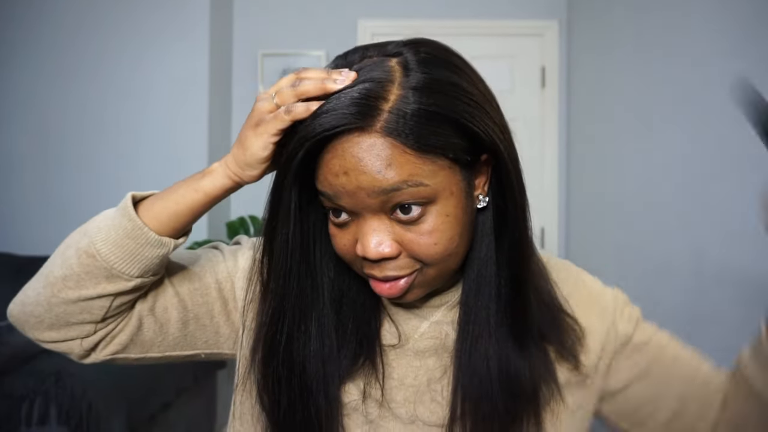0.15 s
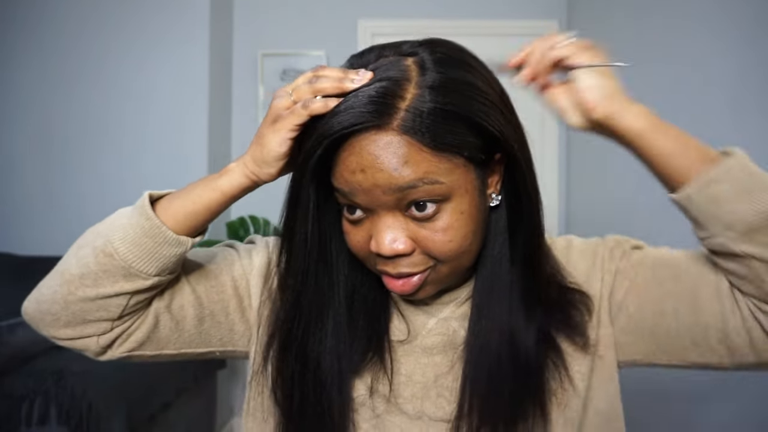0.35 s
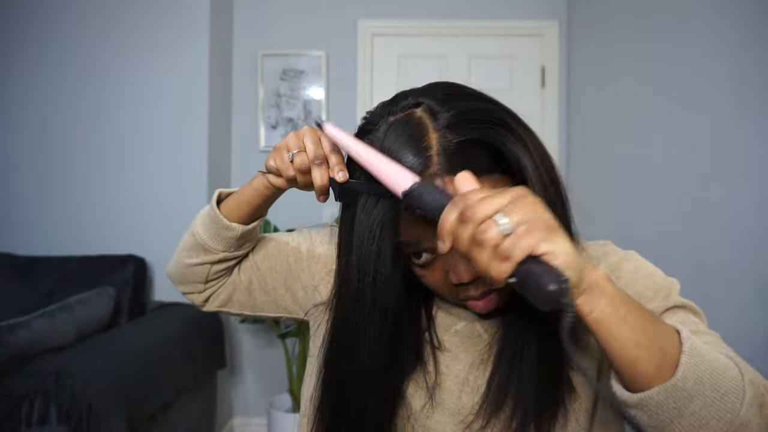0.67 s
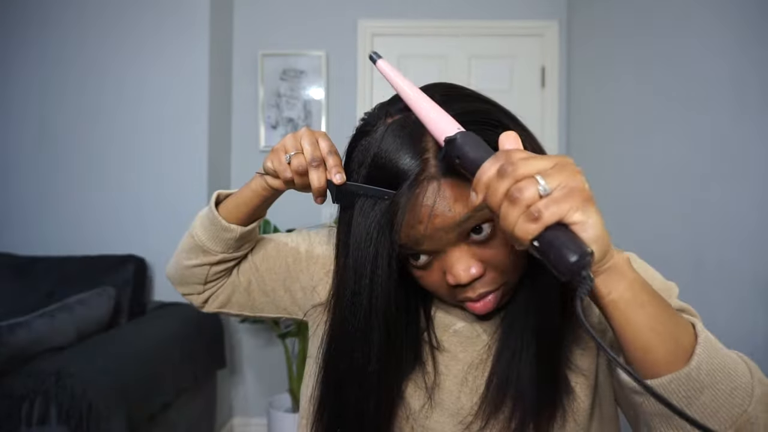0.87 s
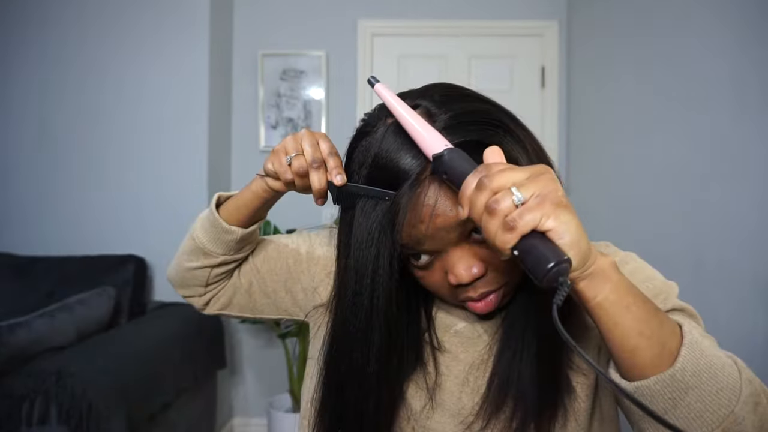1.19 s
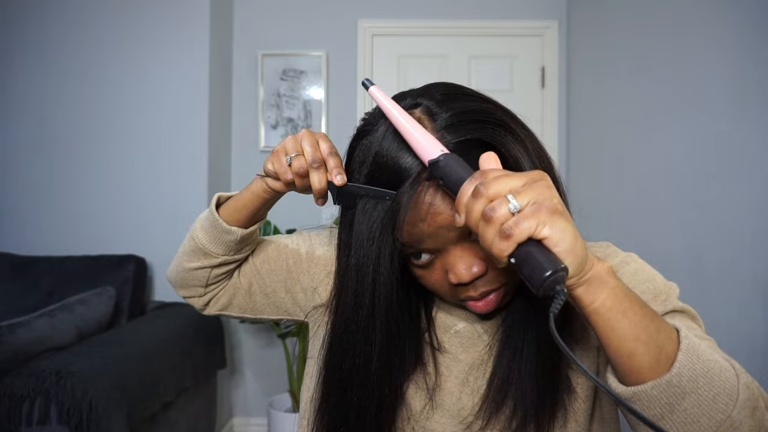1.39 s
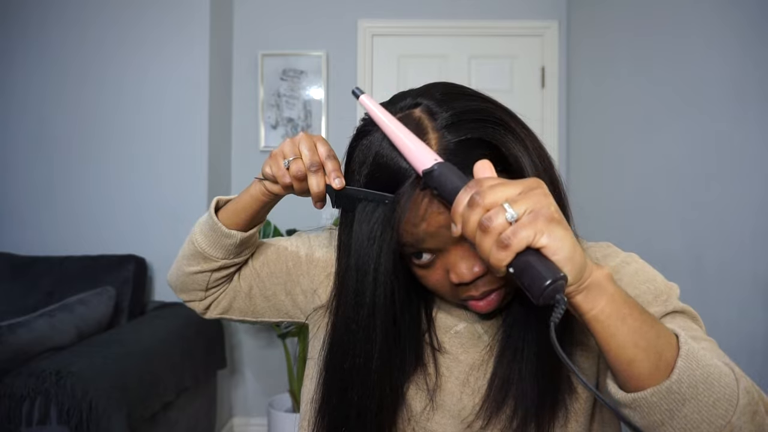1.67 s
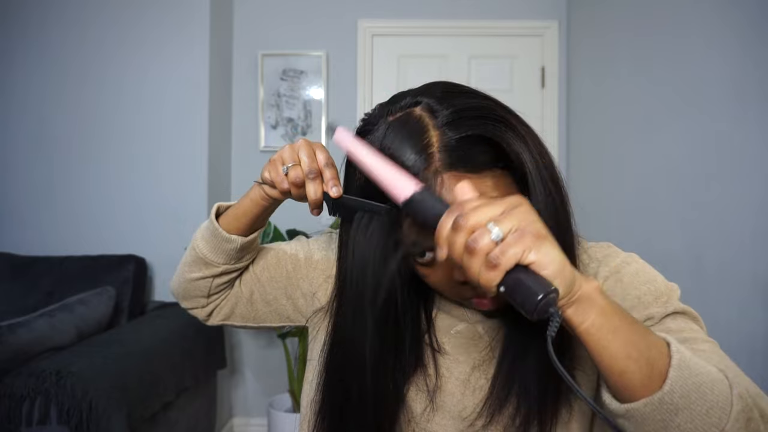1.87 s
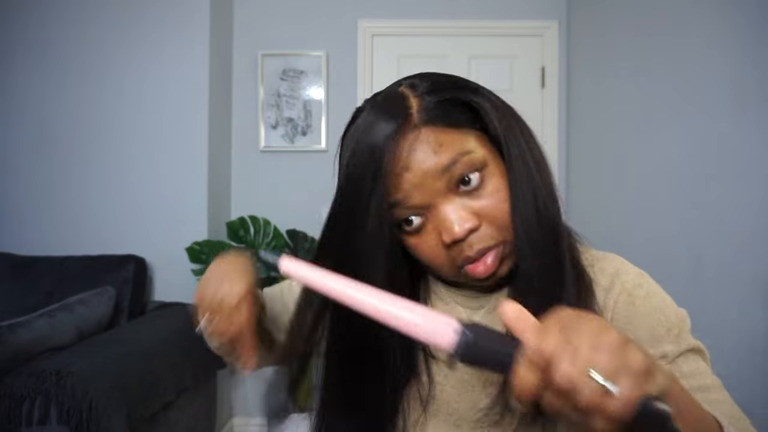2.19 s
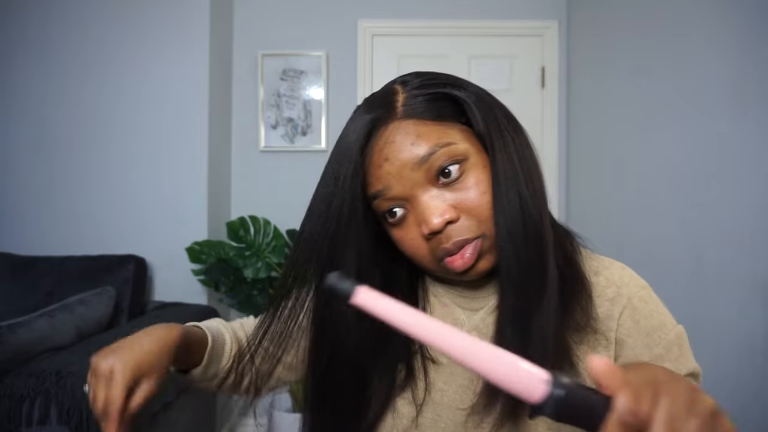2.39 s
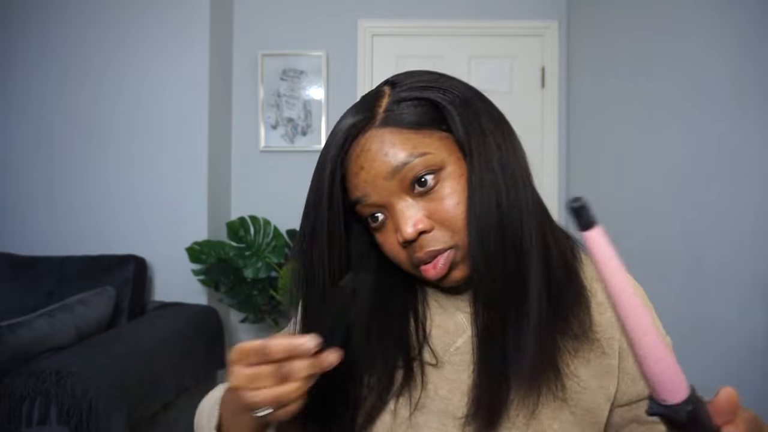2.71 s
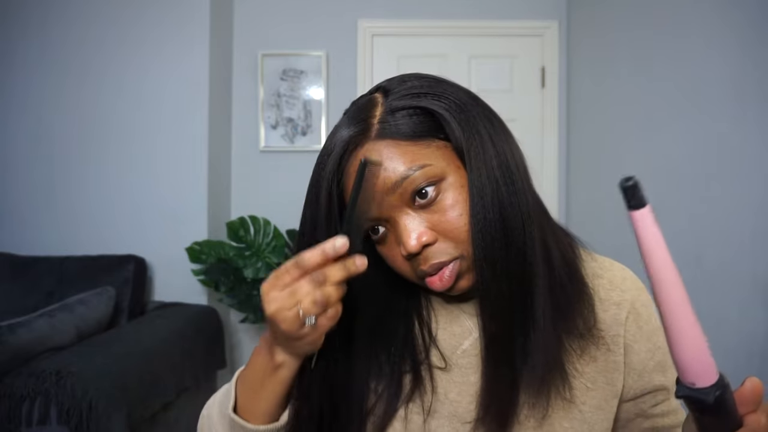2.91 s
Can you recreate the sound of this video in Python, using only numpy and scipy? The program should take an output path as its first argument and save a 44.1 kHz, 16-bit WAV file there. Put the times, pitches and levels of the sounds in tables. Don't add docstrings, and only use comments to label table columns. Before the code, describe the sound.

Plastic hair tools click and knock on a wooden table, slightly right, in a small furnished room with soft hiss. Faint rustling and tiny ticks until 0.6 s, a close fingernail tick at 0.66, a small knocking cluster at 0.9, and a crisp double click at 1.3. From 2.1 s sliding and clatter build to the loudest thud and bright barrel ring near 2.25; more knocks at 2.45, light clicks at 2.75 and 2.9.

```python
import sys
import numpy as np
from scipy import signal
from scipy.fft import rfft, irfft
from scipy.io import wavfile
from scipy.ndimage import uniform_filter1d

SR = 44100
rng = np.random.default_rng(int(sys.argv[2]) if len(sys.argv) > 2 else 0)


def field_ratio(decibels):
    return 10 ** (np.asarray(decibels, dtype=float) / 20)


def to_wav(sig):
    pcm = np.clip(np.atleast_2d(sig), -1, 1) * 32767
    pcm = np.round(pcm).astype(np.int16)
    wavfile.write(sys.argv[1], SR, pcm.T)


N = 134505
HIT_N = 6144


def unit(x):
    return x / np.sqrt(np.mean(x ** 2))


def band(x, hz, width):
    b, a = signal.iirpeak(min(hz, .45 * SR), hz / width, SR)
    return signal.lfilter(b, a, x)


def narrow_band(x, hz, width):
    return band(band(x, hz, width), hz, width)


def high_pass(x, order, hz):
    return signal.lfilter(*signal.butter(order, hz, "high", fs=SR), x)


def decay(t, t60):
    return np.exp(-np.log(1000) * t / t60)


def ring(hz, t60, t):
    return np.sin(2 * np.pi * hz * t) * decay(t, t60)


def lean(db):
    return field_ratio(np.array([[.5], [-.5]]) * db)


def colour(points):
    f = np.fft.rfftfreq(N, 1 / SR) + 1
    hz, db = np.array(points).T
    spectrum = rfft(rng.standard_normal(N)) * field_ratio(np.interp(np.log(f), np.log(hz), db))
    return unit(irfft(spectrum, N))


def hiss():
    # pitch in Hz, level in dB per Hz.
    mid_curve = [(20, -15), (50, -7), (110, -5), (300, -3.5), (700, -8), (1600, -11), (4000, -17),
                 (15000, -21)]
    # pitch in Hz, level in dB per Hz.
    side_curve = [(25, -30), (100, -12), (300, -3.5), (700, -4.5), (1500, -8.5), (3000, -12.5), (7000, -18),
                  (15000, -22.5)]
    mid = field_ratio(-53) * colour(mid_curve)
    side = field_ratio(-53.5) * colour(side_curve)
    hum = field_ratio(-68.5) * unit(band(rng.standard_normal(N), 50.6, 1.7))
    mid = mid + hum
    return np.array([mid + side, mid - side]) * lean(-0.5)


def room_tail():
    # pitch in Hz, t60 in seconds, level in dB.
    fading = [(154, 0.49, -2), (298, 0.34, -1), (594, 0.35, -1), (1200, 0.26, 3.5), (2400, 0.18, 2.5),
              (4830, 0.2, 0.5), (8900, 0.21, -1), (13000, 0.13, 4)]
    t = np.arange(14000) / SR
    age = (t / .025) ** 2
    present = rng.random((2, len(t))) < .02 + age * .1
    seed = rng.standard_normal((2, len(t))) * present / np.sqrt(np.clip(0.05 + age * 0.081, 0, 1))
    tails = np.zeros((2, len(t)))
    for hz, t60, db in fading:
        alike = np.clip(1.35 - hz / 900, .2, 1)
        right = alike * seed[0] + np.sqrt(1 - alike ** 2) * seed[1]
        pair = np.array([seed[0], right])
        tails += field_ratio(db) * band(pair, hz, 0.72 * hz) * decay(t, t60)
    spectrum = rfft(tails)
    size = np.abs(spectrum)
    evened = spectrum * (uniform_filter1d(size, size=80) / (size + 1e-9)) ** .6
    tails = irfft(evened, len(t)) * (t < .28)
    build_up = 1 - np.exp(-t / 0.0025)
    return tails * build_up * field_ratio(-3) / 30


def room(x):
    # delay in seconds, left level in dB, right level in dB.
    echoes = [
        (.0048, -20.5, -16.5),
        (.0095, -6.5, -27.5),
        (.0125, -5, -19),
        (0.0205, -13, -11),
        (.032, -4, -23.5),
    ]
    answer = room_tail()
    click = np.arange(32) == 0
    dull = signal.lfilter(*signal.butter(1, 5940, fs=SR), click)
    for s, left_db, right_db in echoes:
        i = int(s * SR)
        answer[:, i:i + 32] += field_ratio(np.array([[left_db], [right_db]])) * dull
    middle = answer.mean(axis=0)
    answer = middle + high_pass(answer - middle, 2, 830)
    return signal.fftconvolve(x[None], answer, axes=1)[:, :N]


def nail():
    start_s, hz, t60 = .6585, 2820, .016
    t = np.clip(np.arange(N) / SR - start_s, 0, None)
    tones = ring(hz, t60, t) + 0.3 * ring(0.677 * hz, t60, t)
    return field_ratio(-34.5) * tones * (1 - np.exp(-t / 0.00064)) * 2


def rubbing():
    # start in seconds, length in seconds, level in dB, centre in
    # Hz, width in Hz.
    rubs = [(.11, .4, -57, 2500, 300), (.172, .3, -55, 2860, 1200), (.18, .1, -61, 6000, 7000),
            (.149, .44, -60, 1000, 600), (.356, .15, -51, 3300, 1800), (.48, .2, -56, 11000, 9300),
            (.52, .045, -50, 13100, 4000), (.52, .036, -50, 2440, 2500), (2.255, .07, -53, 62, 40),
            (2.74, .075, -53, 150, 60), (.67, .056, -64, 2890, 300), (.875, .042, -52, 3100, 1200),
            (1.27, .06, -53, 2500, 4000), (1.31, .08, -54, 4800, 3000), (1.33, .28, -57, 193, 119),
            (1.85, .06, -60, 2900, 500), (1.9, .085, -53, 3100, 2300), (.905, .09, -45, 3300, 1800),
            (2.255, .045, -43, 4000, 1300), (2.03, .1, -57, 1930, 2000), (2.117, .38, -46, 1960, 1800),
            (2.152, .05, -35, 192, 70), (2.43, .064, -41, 196, 60), (2.519, .19, -56, 2500, 180),
            (2.555, .14, -63, 11200, 90), (2.868, .11, -52, 3900, 1500), (2.494, .26, -55.5, 1100, 910),
            (.72, .16, -62, 170, 120)]
    grains_per_s, scatter_db = 3000, 2.5
    t = np.arange(20000) / SR
    out = np.zeros(N + len(t))
    for s, length, db, hz, width in rubs:
        caught = rng.random(len(t)) < grains_per_s / SR
        strength = field_ratio(scatter_db * np.minimum(rng.exponential(size=len(t)), 3))
        noise = rng.standard_normal(len(t))
        grains = 0.13 * noise + caught * np.sign(noise) * strength
        swell = np.sin(np.pi * np.clip(t / length, 0, 1) ** 0.5)
        i = int(s * SR)
        out[i:i + len(t)] += field_ratio(db) * swell * unit(narrow_band(grains, hz, 1.36 * width))
    return out[:N]


def body(modes, t):
    out = np.zeros(len(t))
    for k, (hz, db, t60) in enumerate(modes):
        chance = rng.standard_normal()
        out += (-1) ** k * field_ratio(db + 2.4 * chance) * ring(hz * (1 + 0.02 * chance), t60, t)
    return out


def contact(hz, crack_db, body_db, modes):
    t = np.arange(HIT_N) / SR
    noise = rng.standard_normal((3, len(t)))
    push = 1 - np.exp(-t / 0.00083)
    rough = narrow_band(noise[0], 0.81 * hz, 0.76 * hz)
    click = (np.sin(2 * np.pi * hz * t) + 2.08 * rough) * decay(t, 0.0073) * push ** 2 * 6
    crack = band(noise[1], 3400, 12000) * decay(t, 0.0067) * push * 2.1
    rattle = narrow_band(noise[2], hz, 1.08 * hz) * decay(t, 0.039) * 4
    thud = body(modes, t) * (1 - np.exp(-t / 0.0015)) * 0.87
    return click + field_ratio(-13) * rattle + field_ratio(crack_db) * crack + field_ratio(body_db) * thud


def contacts(rows, modes):
    out = np.zeros(N + HIT_N)
    for s, db, hz, crack_db, body_db in rows:
        i = int(s * SR)
        out[i:i + HIT_N] += field_ratio(db) * contact(hz, crack_db, body_db, modes)
    return out[:N]


def barrel():
    # pitch in Hz, level in dB, t60 in seconds.
    barrel_modes = [(3371, 9, 0.018), (4336, -2, 0.033), (7290, 1, 0.014)]
    # start in seconds, level in dB.
    bumps = [
        (2.253, -30.5),
        (2.260, -36),
        (2.2685, -25),
    ]
    t = np.arange(HIT_N) / SR
    out = np.zeros(N + HIT_N)
    for s, db in bumps:
        i = int(s * SR)
        out[i:i + HIT_N] += field_ratio(db - 1) * body(barrel_modes, t)
    return out[:N]


def ticks():
    # pitch in Hz, level in dB, t60 in seconds.
    handle_modes = [(382, -2.5, 0.022), (519, 4, 0.025), (702, 0.5, 0.031), (963, 1.5, 0.037),
                    (1400, 14, 0.016)]
    # start in
    # seconds, level in dB, click pitch in Hz, crack in dB against the click, handle in dB against the click.
    touches = [(.202, -40, 2730, -26, -12), (.254, -42, 2530, -20, -23), (.539, -42.5, 2820, -11, -8),
               (1.305, -27, 1796, -32, -16), (1.3108, -24.5, 2580, -6, -7.5), (1.486, -46, 2080, -19, -4),
               (2.046, -44.5, 2070, -18, -1.5), (2.1085, -24.5, 1243, -9.5, -25),
               (2.1155, -22.5, 1930, -35, -8), (2.7395, -33.5, 1400, -27, -13),
               (2.7458, -28.5, 1967, -4, -7.5), (2.875, -38, 2700, -20, -22),
               (2.874, -42.5, 4200, -20, -30), (2.7465, -32, 2720, -22, -18), (1.308, -33, 2000, -30, -6.5),
               (2.443, -34, 1400, -30, -1), (1.3112, -30, 5330, -2, -34), (.9078, -34, 3020, -21, 3.5),
               (2.888, -42, 2560, -17, -16), (2.91, -49, 3914, -21, -2), (.916, -37, 2880, -20, -19),
               (.9335, -41, 2540, -18, -15), (.9465, -31.5, 1680, -27, -14), (.957, -43, 2720, -20, -10),
               (1.3205, -33.5, 4900, -2, -25), (1.3315, -33.5, 3140, 0, -15),
               (1.345, -35.5, 1600, -20, -15), (2.1115, -26.5, 1720, -21, -18),
               (2.167, -25.5, 2460, -20, -20), (2.183, -35, 2400, -20, -9), (2.2035, -30, 2300, -17, -20),
               (2.256, -18.5, 2200, -15, -11), (2.2635, -20.5, 1200, -20, -12),
               (2.272, -20.5, 2310, -20, -15), (2.279, -30.5, 4380, -15, -21), (2.299, -30, 2500, -20, -20),
               (2.4105, -32.5, 930, -25, -15), (2.438, -25, 1730, -23, -18), (2.461, -29.5, 2340, -32, -15),
               (2.7425, -34, 2080, -17, -16), (2.768, -37.5, 2506, -20, -18)]
    return contacts(touches, handle_modes)


def knocks():
    # pitch in Hz, level in dB, t60 in seconds.
    table_modes = [(133.6, -14, 0.11), (198.5, -11, 0.15), (273, -8, 0.095), (325, -6, 0.049),
                   (386, 4, 0.039), (506, -5, 0.044), (607.3, 4, 0.02), (675, -4, 0.0055), (874, -3, 0.028),
                   (1094, -8.5, 0.054), (1355, -7.5, 0.03)]
    # start in seconds, level in dB, click pitch in Hz,
    # crack in dB against the click, table thud in dB against the click.
    set_downs = [(.9068, -29.5, 1400, -31, 5), (.9135, -25, 2400, -27, -4), (.923, -33.5, 3250, -22, -2),
                 (.930, -34.5, 2680, -23, -2), (2.127, -27.5, 2660, -26, -6.5),
                 (2.161, -22, 2130, -26, -13), (2.170, -27.5, 2470, -32, -5.5), (2.188, -43, 2100, -10, -6),
                 (2.222, -31, 1880, -21, -3), (2.247, -16, 1880, -36, 4.5), (2.253, -17, 1263, -7, -1.5),
                 (2.259, -21, 2200, -13, -12), (2.2685, -22, 2944, 4, -5.5),
                 (2.4348, -23.5, 1990, -31, -11), (2.456, -24, 1990, -30, -12),
                 (2.466, -32.5, 2160, -28, -18.5), (2.485, -32.5, 2000, -20, -20),
                 (2.493, -29, 1980, -26, -12.5)]
    return contacts(set_downs, table_modes)


def tools():
    return high_pass(ticks() + knocks() + barrel(), 2, 64)


def scene():
    dry = tools() + rubbing()
    lag = int(.00003 * SR)
    near = np.array([np.roll(dry, lag), dry]) + room(dry) + nail()
    low = signal.lfilter(*signal.butter(1, 1094, fs=SR), near)
    return low + (near - low) * lean(-7) + hiss()


def band_limit(x):
    return signal.sosfilt(signal.butter(12, 16010, fs=SR, output="sos"), x)


def record(dry):
    cut = signal.sosfilt(signal.ellip(12, .2, 80, 15600, fs=SR, output="sos"), dry)
    return band_limit(cut)


dry = scene()
out = record(dry)
to_wav(out)
```